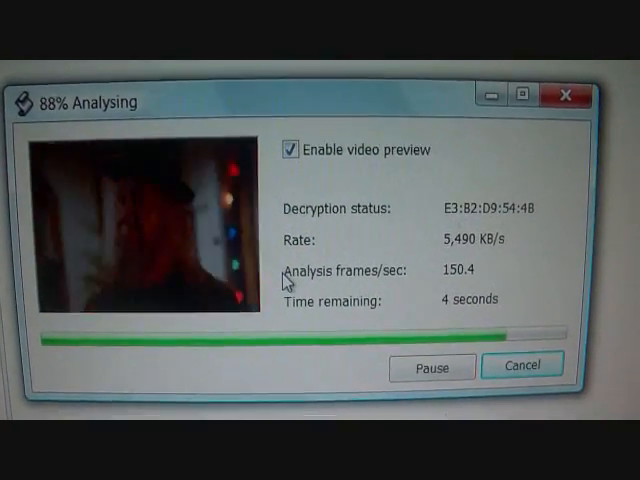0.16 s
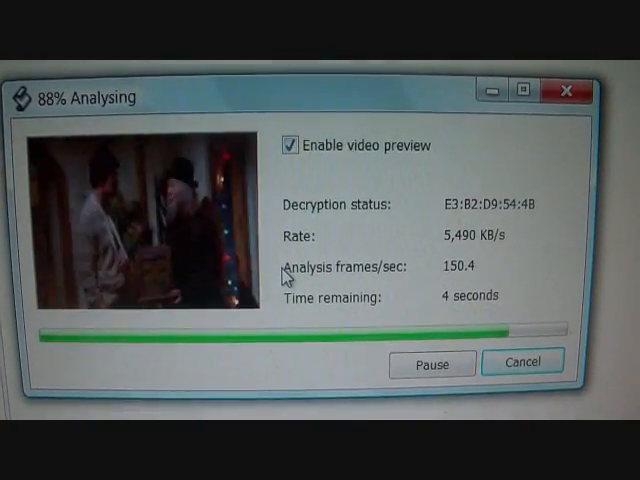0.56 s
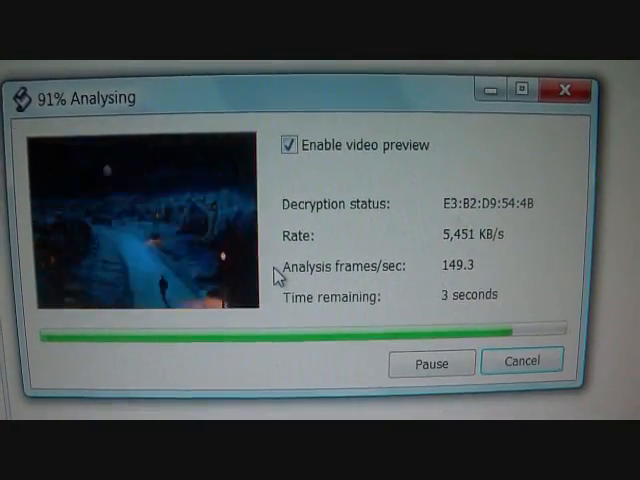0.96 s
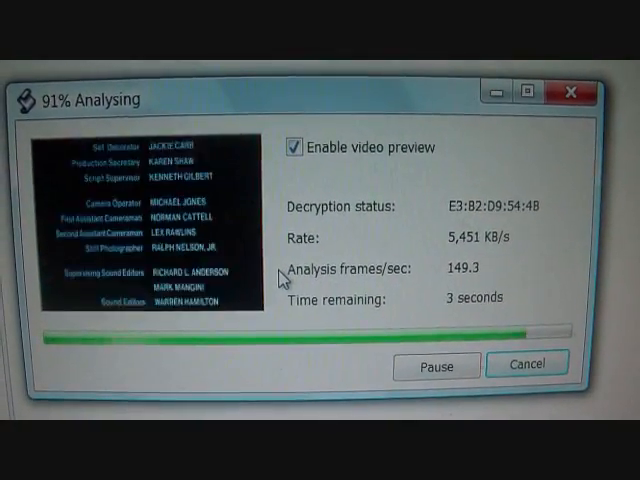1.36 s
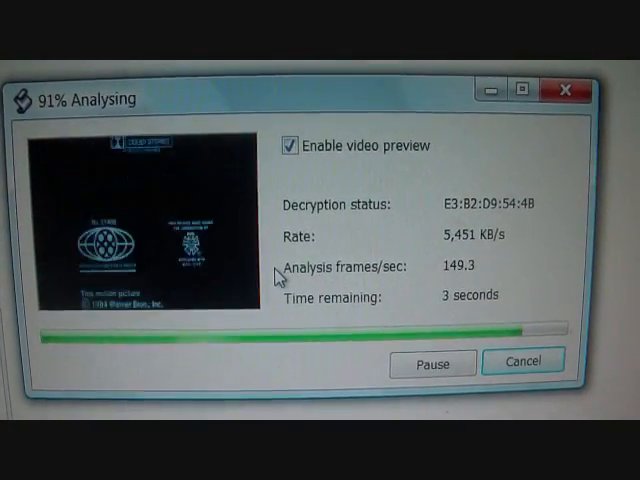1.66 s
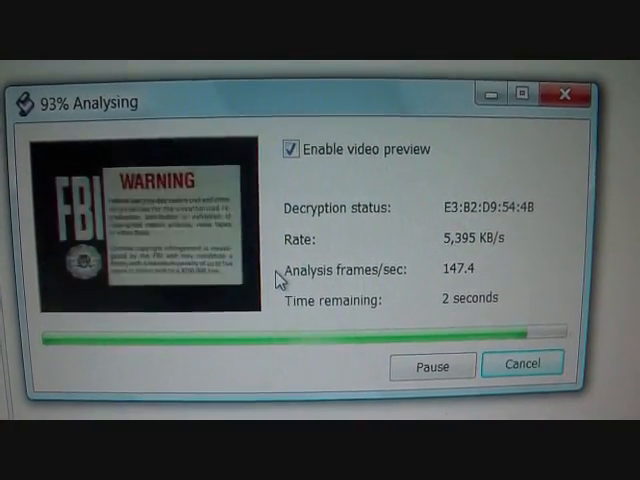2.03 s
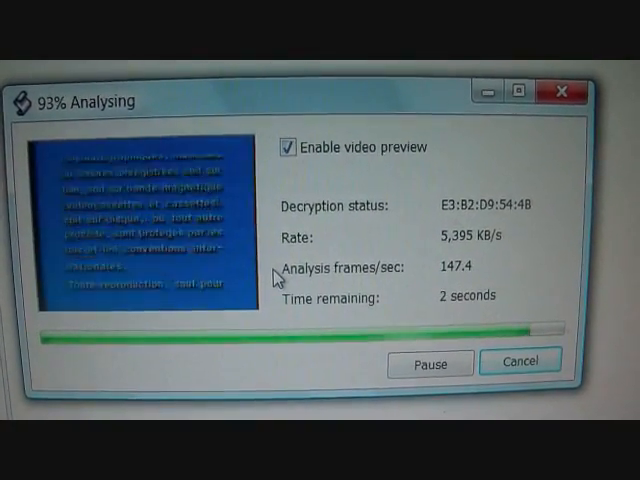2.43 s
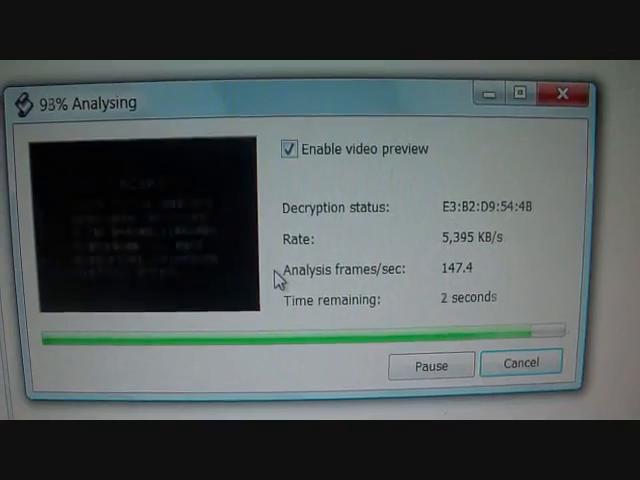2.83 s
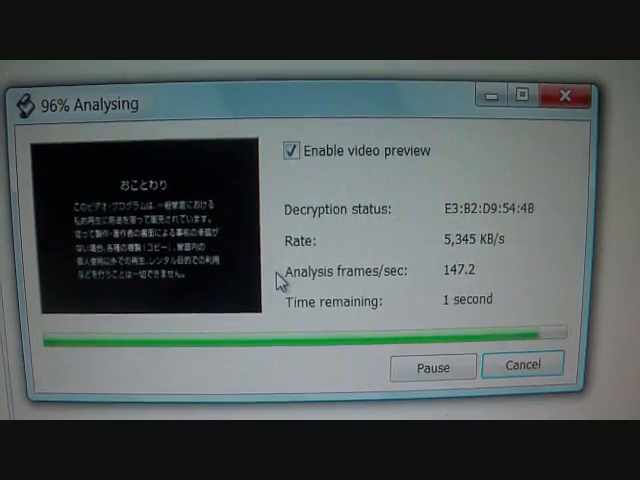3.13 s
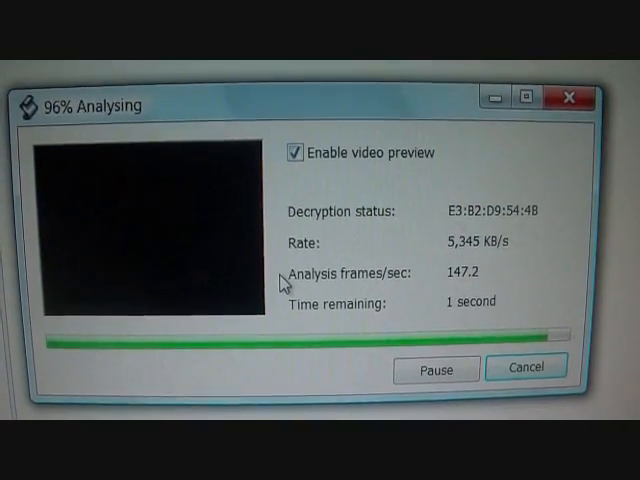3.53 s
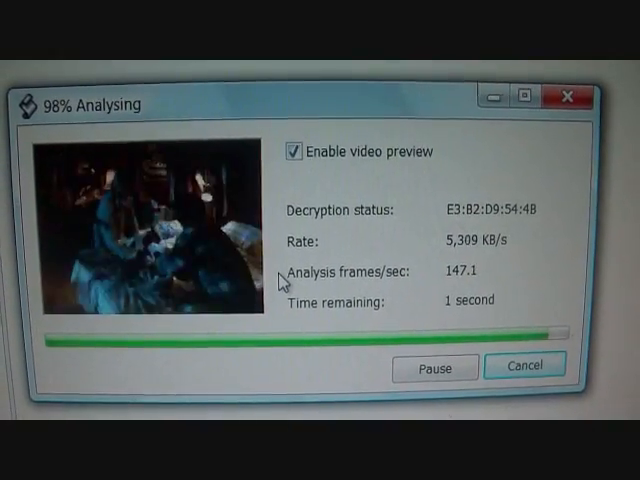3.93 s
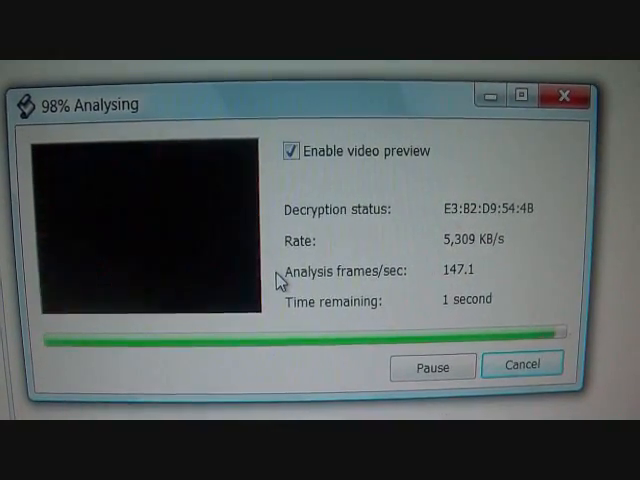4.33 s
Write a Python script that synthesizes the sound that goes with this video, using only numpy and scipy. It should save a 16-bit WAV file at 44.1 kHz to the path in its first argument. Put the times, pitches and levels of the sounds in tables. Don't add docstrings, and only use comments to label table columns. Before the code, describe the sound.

Steady low humming and airy whoosh from a spinning disc drive in a quiet room, with faint sharp ticks and a deep lorry boom growing outside.

```python
import sys
import numpy as np
from scipy import signal
from scipy.fft import rfft, irfft
from scipy.io import wavfile
from scipy.ndimage import uniform_filter1d

SR = 44100
rng = np.random.default_rng(int(sys.argv[2]) if len(sys.argv) > 2 else 0)


def generate_wav(signal):
    frames = np.transpose(np.atleast_2d(signal))
    scaled = np.clip(frames, -1, 1) * 32767
    pcm = np.round(scaled).astype(np.int16)
    wavfile.write(sys.argv[1], SR, pcm)


def ratio(d):
    e = np.asarray(d, float) / 20
    return 10 ** e


N = 197744

# multiple of the shaft rate, rms level in dB, flutter in dB.
ROTOR_TONES = [(1, -54, 1), (3, -40, .3), (5, -66, 1), (8, -60, 1.5), (28, -68, 2), (35, -70, 2),
               (49, -85, 2), (12, -52, 1.5), (13, -58, 2), (21, -62, 2), (24, -70, 2)]
# frequency in Hz, level in dB per Hz.
AIR_COLOUR = [(59, -46), (100, -5), (174, -13), (235, -12.5), (373, -14.5), (530, -8), (675, -16.5),
              (908, -17.5), (1370, -23.5), (1740, -24.5), (2710, -23.5), (4150, -45), (6600, -32.5),
              (7660, -38.5), (8400, -84.5), (10900, -104), (18500, -120)]
# frequency in Hz, width in Hz, lift in dB.
CASE_RESONANCES = [(115, 6.7, 0.5), (292.4, 51, 10), (448, 26, 6), (524, 35, 2.5), (577, 34, 4.5),
                   (793, 65, 9), (930, 120, 1), (1129, 121, 7.5), (1736, 120, 7.5), (2120, 120, 4),
                   (2360, 270, 3.5), (2590, 510, -4), (6320, 330, -0.5), (383.4, 76, -6), (700, 28, -3),
                   (4190, 420, -4), (5400, 380, 3.5), (2920, 69, -3.5), (3360, 45, 4.5), (249, 19, -6)]
# time in seconds, level in dB, firing rate in Hz.
LORRY_APPROACH = [
    (2.4, -58, 47.9),
    (2.62, -38.5, 46.96),
    (2.9, -29.5, 44.7),
    (3.3, -34, 39.53),
    (3.52, -39.5, 38.7),
    (3.97, -31, 38.84),
    (4.13, -36, 38.13),
    (4.3, -26, 38.2),
    (4.48, -24.5, 38.55),
]
# lowest Hz, highest Hz, level in dB.
RUMBLE_MODES = [
    (34, 50, -43),
    (67.3, 79, -45.5),
    (85.6, 95, -48),
]
# start in seconds, peak in dB, lowest Hz the shell passes, ring in dB, rattle in dB.
MOTOR_TICKS = [
    (1.5, -16.5, 930, 6, -21),
    (2.0122, -19.5, 930, 1.5, -25.5),
    (2.5956, -23, 893, -1, -21.5),
    (3.17, -23, 1056, 0, -20.5),
    (3.748, -13.5, 895, -8, -28),
]
# start in seconds, length in seconds, rms level in dB.
MOTOR_SCRAPES = [
    (1.506, .02, -54),
    (2.354, .024, -49),
    (2.648, .016, -46),
    (3.765, .025, -55),
]

SHAFT_HZ, BLADES_DB = 76.376, -37.5
DISC_HZ, DISC_DB = 303.06, -50.5
FOURTH_DB, IN_STEP_S = -53.5, .3
AIR_DB, AIR_FLAT_HZ = -39, 7500
MAINS_HZ, MAINS_DB = 120, -53
GAIN_RISE_DB, GAIN_SETTLE_S = 0.45, .3
IDLE_HZ, IDLE_DB, IDLE_OCTAVE_DB = 41.83, -44, 2.5
IDLE_PULL_HZ = .45
IDLE_FROM_S, IDLE_UNTIL_S, IDLE_FADE_S = .05, 1.92, 0.097
LORRY_OCTAVE_DB = -13.5
THROB_HZ, THROB_PEAK_S, THROB_DEPTH = 6.135, 4.29, .35
SUB_DB = -47.5
SHELL_TOP_HZ = 1367


def level(x, db):
    return x * ratio(db) / np.sqrt(np.mean(x ** 2))


def walk(rate):
    hold = int(SR / rate)
    steps = np.repeat(rng.standard_normal(N // hold + 1), hold)
    smooth = uniform_filter1d(uniform_filter1d(steps, hold), hold)
    return level(smooth[:N], 0)


def curve(table):
    seconds, *columns = np.transpose(table)
    t = np.arange(N) / SR
    return [np.interp(t, seconds, column) for column in columns]


def band(lo_hz, hi_hz):
    sos = signal.butter(3, [lo_hz, hi_hz], "bandpass", fs=SR, output="sos")
    return level(signal.sosfilt(sos, rng.standard_normal(N)), 0)


def rotor(turn):
    out = ratio(BLADES_DB + 1.8 * walk(16)) * np.sin(7 * turn)
    for order, db, flutter_db in ROTOR_TONES:
        loudness = ratio(db + flutter_db * walk(13))
        start_phase = 2 * np.pi * rng.random()
        out = out + loudness * np.sin(round(order) * turn + start_phase)
    return np.sqrt(2) * out


def disc(turn):
    t = np.arange(N) / SR - IN_STEP_S
    hum = np.sin(2 * np.pi * DISC_HZ * t + .25 * walk(4))
    fourth = np.sin(4 * (turn - turn[int(IN_STEP_S * SR)]))
    return level(hum, DISC_DB) + level(fourth, FOURTH_DB)


def air():
    hz = np.fft.rfftfreq(N, 1 / SR) + 1
    colour_hz, colour_db = np.transpose(AIR_COLOUR)
    db = np.interp(np.log(np.minimum(hz, AIR_FLAT_HZ)), np.log(colour_hz), colour_db)
    for centre_hz, width_hz, lift_db in CASE_RESONANCES:
        db = db + lift_db / (1 + ((hz - centre_hz) / (width_hz / 2)) ** 2)
    rush = rfft(rng.standard_normal(N)) * ratio(db)
    half_octave = 2 * np.log2(hz / 100)
    out = 0
    for k in range(14):
        share = np.clip(1 - abs(half_octave - k), 0, 1)
        out = out + ratio(0.29 * walk(6)) * irfft(rush * share, N)
    return level(out, AIR_DB)


def engine(db, hz, octave_db, waver, rough):
    phase = 2 * np.pi * np.cumsum(hz * (1 + waver * walk(13))) / SR
    swing = 1 + rough * walk(25)
    tone = np.sin(phase) + ratio(octave_db) * np.sin(2 * phase)
    return np.sqrt(2) * ratio(db) * swing * tone


def traffic():
    t = np.arange(N) / SR
    swell = 1 + np.tanh((t - IDLE_FROM_S) / IDLE_FADE_S)
    fade = 1 - np.tanh((t - IDLE_UNTIL_S) / IDLE_FADE_S)
    idle_hz = IDLE_HZ + IDLE_PULL_HZ * np.minimum(t, IDLE_UNTIL_S) ** 3
    idle = swell * fade / 4 * engine(IDLE_DB, idle_hz, IDLE_OCTAVE_DB, waver=.008, rough=.2)
    throb = 1 + THROB_DEPTH * np.cos(2 * np.pi * THROB_HZ * (t - THROB_PEAK_S))
    lorry_db, lorry_hz = curve(LORRY_APPROACH)
    lorry = throb * engine(lorry_db, lorry_hz, LORRY_OCTAVE_DB, waver=.02, rough=0.12)
    rumble = sum(ratio(db) * band(lo_hz, hi_hz) for lo_hz, hi_hz, db in RUMBLE_MODES)
    return idle + lorry + rumble + ratio(SUB_DB) * band(12, 34)


def focus_motor():
    out = np.zeros(N)
    t = np.arange(int(.06 * SR)) / SR
    tap = 1. * (t == 0)
    rattle = band(5100, 8200) + .7 * band(6500, 8400)
    rub = band(1700, 3400)
    thump = signal.sosfilt(signal.butter(2, [550, 900], "bandpass", fs=SR, output="sos"), tap)
    for s, db, lo_hz, ring_db, rattle_db in MOTOR_TICKS:
        i = int((s - .0006) * SR)
        shell = signal.cheby1(3, 1.5, [lo_hz, SHELL_TOP_HZ], "bandpass", fs=SR, output="sos")
        knock = -signal.sosfilt(shell, tap)
        ring = signal.lfilter(*signal.iirpeak(1.105 * lo_hz, 9., fs=SR), knock)
        body = knock / abs(knock).max()
        body = body + ratio(ring_db) * ring / abs(ring).max()
        body = body + 0.34 * thump / abs(thump).max()
        burst = np.exp(-((t - .0019) / .002) ** 4) * rattle[i:i + len(t)]
        tick = body / abs(body).max() + ratio(rattle_db - 2.5) * burst
        out[i:i + len(t)] += ratio(db) * tick
    for s, length_s, db in MOTOR_SCRAPES:
        i, n = int(s * SR), int(length_s * SR)
        scrape = (rattle + .7 * rub)[i:i + n]
        out[i:i + n] += ratio(db - 3.5) * np.hanning(n) * scrape
    return out


def scene():
    t = np.arange(N) / SR
    turn = 2 * np.pi * SHAFT_HZ * t + .2 * walk(.9)
    mains = level(np.sin(2 * np.pi * MAINS_HZ * t), MAINS_DB)
    gain = ratio(2.0 - GAIN_RISE_DB * np.exp(-t / GAIN_SETTLE_S))
    computer = gain * (rotor(turn) + disc(turn) + air() + mains)
    return (computer + traffic() + focus_motor())[None]


def low_pass(x):
    return signal.sosfilt(signal.butter(12, 8600, fs=SR, output="sos"), x)


def record(dry):
    low_rate = signal.cheby1(14, .5, 7770, fs=SR, output="sos")
    narrow = signal.sosfilt(low_rate, dry)
    return low_pass(narrow)


dry = scene()
out = record(dry)
generate_wav(out)
```